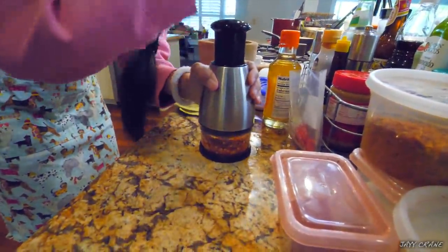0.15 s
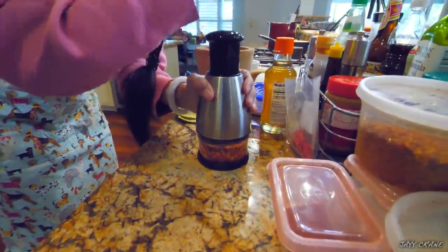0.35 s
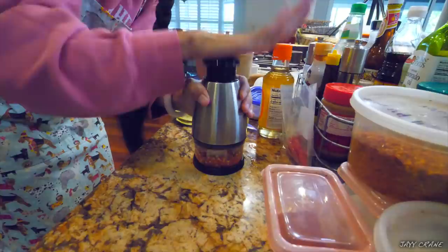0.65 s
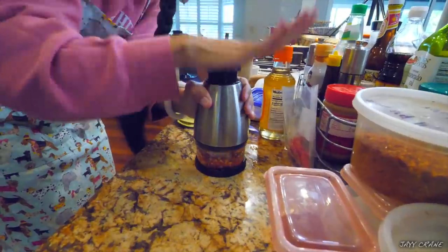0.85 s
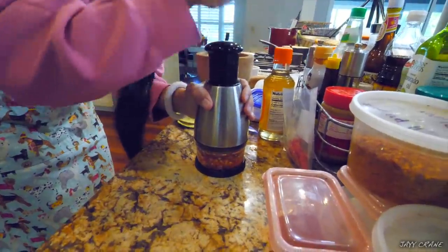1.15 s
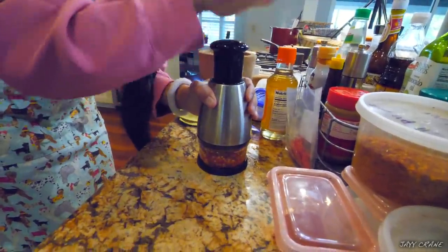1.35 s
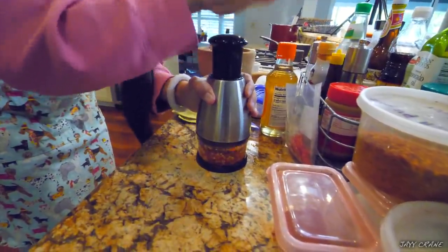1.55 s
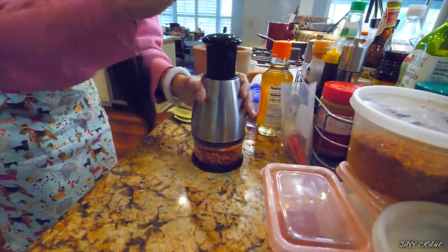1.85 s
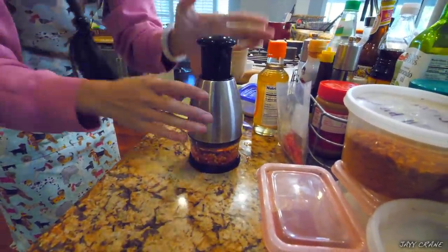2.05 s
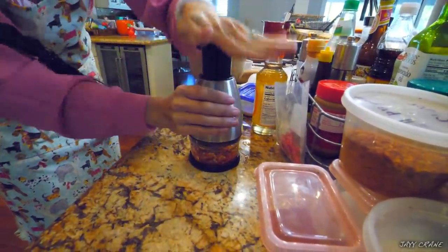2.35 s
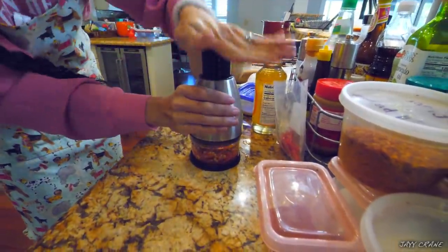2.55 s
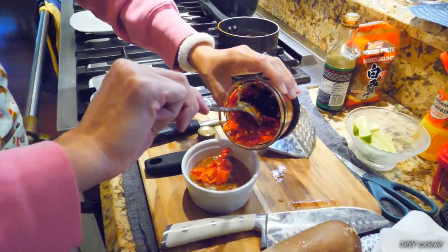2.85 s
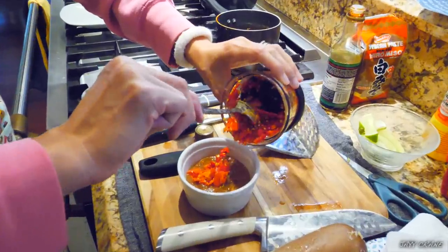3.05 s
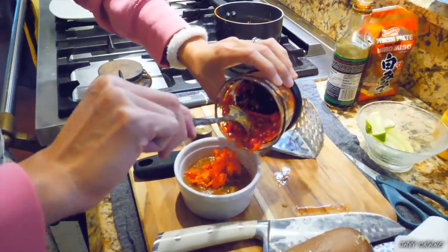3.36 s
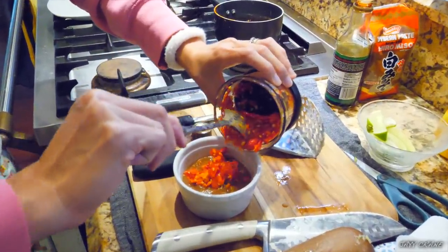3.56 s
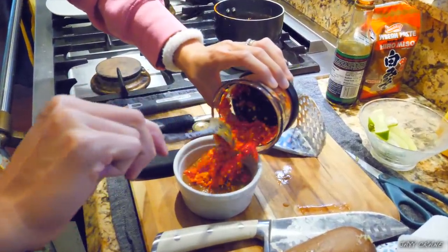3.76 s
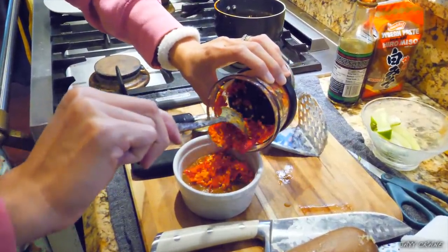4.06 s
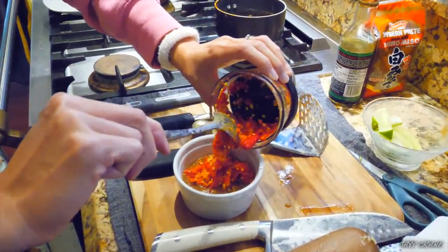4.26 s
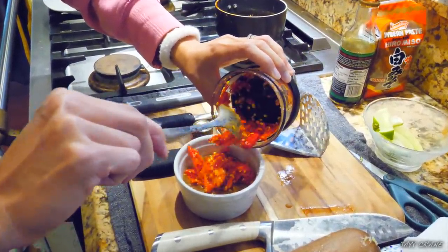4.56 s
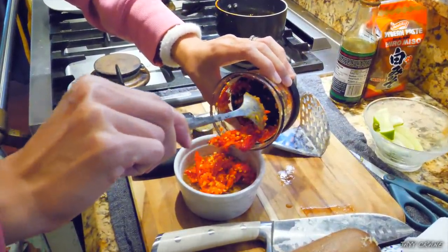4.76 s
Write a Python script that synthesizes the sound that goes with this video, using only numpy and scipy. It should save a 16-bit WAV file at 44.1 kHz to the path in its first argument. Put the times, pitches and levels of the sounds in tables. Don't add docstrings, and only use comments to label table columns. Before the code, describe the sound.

Eleven fast clattering presses of a steel plunger chopper in a hard kitchen, then an abrupt cut to faint spoon scraping over a low hum.

```python
import sys
import numpy as np
from scipy import signal
from scipy.io import wavfile
from scipy.ndimage import uniform_filter1d

SR = 44100
rng = np.random.default_rng(int(sys.argv[2]) if len(sys.argv) > 2 else 0)


def attenuation_scalar(level_db):
    decades = np.asarray(level_db, float) / 20
    return 10 ** decades


def master(y):
    cut = np.clip(np.atleast_2d(y).T, -1, 1)
    pcm = np.round(cut * 32767)
    wavfile.write(sys.argv[1], SR, pcm.astype(np.int16))


N = 216387


def evened(x):
    return x / np.sqrt(np.mean(x ** 2) + 1e-20)


def peaked(x):
    return x / np.sqrt(uniform_filter1d(x ** 2, size=128).max() + 1e-20)


def read(points, hz):
    f, value = np.transpose(points)
    return np.interp(np.log(hz + 1), np.log(f + 1), value)


def add(mix, s, sound):
    part = mix[max(round(s * SR), 0):][:len(sound)]
    part += sound[:len(part)]


def shaped(x, spectrum):
    hz = np.linspace(0, SR / 2, 513)
    return signal.oaconvolve(x, signal.firwin2(1023, hz, attenuation_scalar(read(spectrum, hz)), fs=SR), "same")


def ring(x, modes, spread_db=0, shift=0):
    out = np.zeros(len(x))
    for (hz, width, db), (level_luck, pitch_luck) in zip(modes, rng.standard_normal((len(modes), 2))):
        radius = np.exp(-np.pi * width / SR)
        angle = 2 * np.pi * hz * (1 + shift * pitch_luck) / SR
        poles = [1, -2 * radius * np.cos(angle), radius ** 2]
        gain = attenuation_scalar(db + spread_db * level_luck) * (1 - radius ** 2)
        out += gain * signal.lfilter([1, 0, -1], poles, x)
    return out


def coloured(spectrum, patchy_db):
    hz = np.fft.rfftfreq(1024, 1 / SR)
    a, b, patches = rng.standard_normal((N // 256 + 5, 513, 3)).T
    patches = uniform_filter1d(patches, size=12, axis=0)
    patches = evened(uniform_filter1d(patches, size=14, axis=1))
    z = (a + 1j * b) * attenuation_scalar(read(spectrum, hz)[:, None] + patchy_db * patches)
    return evened(signal.istft(z, nperseg=1024, noverlap=768)[1][:N])


def gritty(grit_db):
    unevenness = evened(uniform_filter1d(rng.standard_normal(N), size=60))
    return evened(rng.standard_normal(N) * attenuation_scalar(grit_db * unevenness))


# f/Hz, bandwidth/Hz, level/dB
HOLLOW = [(302, 540, -4.5), (454, 270, 1), (645, 89, -3), (920, 240, -8)]
# f/Hz, bandwidth/Hz, level/dB
SHELL = [(1045, 120, 6.5), (1400, 530, 3.5), (1698, 310, -17), (2210, 300, 2), (1500, 7500, -8)]
# f/Hz, bandwidth/Hz, level/dB
CRACK = [(4550, 720, 3.5), (4900, 67, -9), (5500, 840, 1.5), (6500, 400, -1), (7860, 550, 0.5),
         (9100, 1000, -11.5), (6000, 5000, -3.5), (12000, 7200, -0.5)]
SMALL_BODY = signal.butter(4, 190, "high", fs=SR, output="sos")


def clack(mix, s, shell_db, hollow_db, ring_db, crack_db, blades, rattle_s,
          blow=3., lead_s=0., bounce=0., crack=CRACK, cavity=HOLLOW):
    t = np.arange(2500) / SR - lead_s
    chatter = rng.standard_normal(2500) * np.exp(-(np.maximum(t, 0) / rattle_s) ** 2.3)
    early = chatter * np.minimum((t + lead_s) / (lead_s + 0.1 * rattle_s), 1)
    late = chatter * np.clip(t / (0.29 * rattle_s), 0, 1)
    hit = np.exp(-((t - .0002) / .00006) ** 2)
    second_hit = np.exp(-((t - .0018) / .00006) ** 2)
    push = -blow * (hit + bounce * second_hit)
    sound = attenuation_scalar(crack_db) * peaked(ring(early + push, crack, spread_db=5.5, shift=.015))
    sound += attenuation_scalar(ring_db) * peaked(ring(late + push, blades, spread_db=4.5, shift=0.0075))
    sound += attenuation_scalar(shell_db) * peaked(ring(late + push, SHELL, spread_db=4.0, shift=.04))
    sound += attenuation_scalar(hollow_db) * peaked(ring(1.6 * late + push, cavity, spread_db=0.5, shift=.03))
    add(mix, s - lead_s, signal.sosfilt(SMALL_BODY, sound))


# f/Hz, bandwidth/Hz, level/dB
RING_UP = [(3000, 130, -8), (3214, 76, 0), (3292, 150, 1.5), (3443, 89, -2.5)]


def small_clack(mix, kind, s, db, hz, rattle_s=None):
    body_db, ring_db, usual_rattle_s = kind
    clack(mix, s, db + body_db, db + body_db - 1.5, db + ring_db, db, RING_UP, rattle_s or usual_rattle_s,
          blow=.4, crack=CRACK + [(hz, 170, 16)], cavity=HOLLOW[1:])


# t/s, body level/dB, steel level/dB, downward slide level/dB
SLAPS = [(.0062, -20, -13, -28.5), (.2146, -14.5, -12.5, -22), (.4357, -16, -12, -19),
         (.643, -16, -12.5, -19.5), (.8502, -12, -15, -22), (1.0513, -17, -10.5, -22.5),
         (1.2617, -19, -10.5, -19), (1.4569, -23.5, -20.5, -31), (1.662, -23, -14, -23.5),
         (2.2963, -28.5, -17, -33.5), (2.508, -26.5, -14.5, -22)]
# f/Hz, bandwidth/Hz, level/dB
RING_DOWN = [(2945, 240, 5), (3170, 150, -0.5)]


def slaps(mix):
    for s, body_db, steel_db, _ in SLAPS:
        clack(mix, s, body_db, body_db - 10.5, steel_db - 12.5, steel_db, RING_DOWN, .005,
              blow=2.5, lead_s=.0018, cavity=HOLLOW[1:])


# t/s, body level/dB, steel level/dB, counter thud level/dB
LANDINGS = [(.0252, -21.5, -21.5, -25.5), (.2333, -17, -23.5, -21.5), (.4549, -19, -22, -24.5),
            (.662, -15, -17, -24.5), (.8712, -18.5, -26, -32), (1.0704, -38, -25, -30.5),
            (1.2797, -21.5, -20.5, -26), (1.48, -33.5, -28.5, -32.5), (1.682, -33, -26.5, -34.5),
            (2.3173, -21, -19.5, -28.5), (2.5242, -22.5, -19, -40)]
# f/Hz, bandwidth/Hz, level/dB
THUD = [(115, 28, 0.016), (178, 53, 0.00016)]


def landings(mix):
    for s, body_db, steel_db, thud_db in LANDINGS:
        clack(mix, s, body_db, body_db - 0.052, steel_db, steel_db, RING_DOWN, 0.0022, blow=0.81)
        squash = np.diff(np.hanning(130))
        add(mix, s, attenuation_scalar(thud_db) * peaked(ring(np.pad(squash, (0, 6000)), THUD)))


# t/s, body level/dB, steel level/dB, rattle length/s, loudest cup mode f/Hz
RETURNS = [(0.0886, -9.5, -13.5, .0054, 600), (.31, -15, -12.5, .005, 590), (0.5164, -13, -16, .01, 600),
           (.726, -15, -12.5, .0044, 560), (0.9331, -13, -12.5, .009, 600), (1.1394, -16, -16, .0081, 660),
           (1.3491, -18.5, -15, .0081, 600), (1.556, -19, -17, .013, 630), (1.799, -15, -16, .0078, 310),
           (2.403, -12, -14, .0046, 430), (2.6098, -11.5, -14.5, .0056, 540)]


def spring_returns(mix):
    latch = (4.1, -3.4, 0.007)  # body/dB, blade ring/dB, rattle/s
    latch_lead_s, latch_db, latch_fade_db_per_s = .015, -21.5, -2
    for s, body_db, steel_db, rattle_s, cup_hz in RETURNS:
        clack(mix, s, body_db, body_db + 2.2, steel_db + 2.6, steel_db, RING_UP, rattle_s,
              blow=4., bounce=1.1, cavity=HOLLOW + [(cup_hz, 240, 0)])
        click_db = steel_db + latch_db + latch_fade_db_per_s * s
        small_clack(mix, latch, s - latch_lead_s, click_db, 5500)


# t/s, crack level/dB, loudest blade mode f/Hz, rattle length/s
CHATTERS = [(.008, -22, 1650, 0.013), (.013, -23, 3000, .006), (.019, -18, 3900, .004),
            (.433, -19, 8000, 0.0064), (.443, -15.5, 5000, 0.0047), (.642, -14, 4900, 0.0058),
            (1.061, -27.5, 5000, .004), (1.258, -15.5, 4900, .0056), (1.46, -22, 10300, 0.0045),
            (1.67, -23, 3250, 0.0032), (2.296, -4.5, 7050, 0.0022), (2.31, -15.5, 9000, .005),
            (2.52, -22.5, 5000, .005)]
# t/s, crack level/dB, loudest blade mode f/Hz
REBOUNDS = [(.095, -24.5, 4500), (.315, -12.5, 4550), (.7282, -15.5, 6500), (.735, -23, 3200),
            (1.1404, -14.5, 5500), (1.3537, -14, 6300), (1.562, -15.5, 5400), (1.808, -19, 4500),
            (2.419, -29, 7500), (2.621, -26, 4600)]
# t/s, crack level/dB, loudest blade mode f/Hz
CATCHES = [(.268, -38.5, 8000), (.281, -34, 9000), (.499, -35.5, 9500), (1.319, -32.5, 9000),
           (1.361, -37.5, 6246), (1.513, -40, 3000), (1.536, -44, 9000), (1.72, -40.5, 10530),
           (1.835, -37, 9000), (2.236, -62.5, 12730), (2.25, -63, 8000), (2.274, -60.5, 3500),
           (2.578, -35.5, 7000), (2.589, -42, 6500)]


def loose_knocks(mix):
    chatter, rebound, catch = (-15, -12.5, 0.0071), (-4.5, -2, .003), (0, -1.5, .005)  # body/dB, ring/dB, rattle/s
    for rows, kind in ((CHATTERS, chatter), (REBOUNDS, rebound), (CATCHES, catch)):
        for row in rows:
            small_clack(mix, kind, *row)


# f/Hz, spectral level/dB per Hz
SLIDE = [(88, -40.5), (150, -7), (745, -1), (2450, -5), (3100, -14.5), (3620, -8), (6140, -14.5),
         (9080, -9.5), (13400, -14), (16000, -24)]


def sliding():
    rubbing, t = np.zeros(N), np.arange(N) / SR
    rise_db = -39
    for slap, landing, back in zip(SLAPS, LANDINGS, RETURNS):
        down = [slap[0], slap[0] + 0.009, landing[0] + 0.0044, landing[0] + 0.012]
        up = [landing[0], back[0] - .03, back[0]]
        rubbing += attenuation_scalar(slap[3]) * np.interp(t, down, [0.0058, 0.6, 0.96, 0])
        rubbing += attenuation_scalar(rise_db) * np.interp(t, up, [.7, 1, .7], 0, 0)
    slips = gritty(1.8)
    friction = evened(shaped(slips, SLIDE)) + 0.47 * evened(ring(slips, RING_DOWN + CRACK[1:2]))
    return rubbing * evened(friction)


def chopper():
    mix = np.zeros(N)
    slaps(mix)
    landings(mix)
    spring_returns(mix)
    loose_knocks(mix)
    return mix + sliding()


# f/Hz, level/dB, t60/s
SINGING = [(2966, -17, 2.0), (3500, -1.5, 0.16), (3478, -7, 0.17), (3670, -16, 0.4), (4174, -18, 0.41),
           (4540, -21.5, 0.75)]
# t/s, level/dB, f/Hz, t60/s
PINGS = [
    (0.013, -25, 1580, 0.087),
    (.316, -33, 4510, 0.36),
    (1.262, -20.5, 4800, 0.076),
    (.645, -26, 4900, .04),
    (1.672, -17, 3150, 0.041),
    (1.81, -48.5, 3490, .8),
]


def singing():
    mix, t = np.zeros(N), np.arange(SR // 2) / SR
    under_clack_db = -27
    for back, luck in zip(RETURNS, rng.standard_normal((len(RETURNS), len(SINGING), 3))):
        tones = np.zeros(len(t))
        for (hz, db, t60), (level_luck, pitch_luck, phase_luck) in zip(SINGING, luck):
            phase = 2 * np.pi * hz * (1 + 0.0044 * pitch_luck) * t + 3 * phase_luck
            tones += attenuation_scalar(db + 4 * level_luck - 60 * t / t60) * np.sin(phase)
        add(mix, back[0], attenuation_scalar(back[2] + under_clack_db) * peaked(tones))
    for s, db, hz, t60 in PINGS:
        onset = np.minimum(t / .002, 1)
        add(mix, s, attenuation_scalar(db - 60 * t / t60) * onset * np.sin(2 * np.pi * hz * t))
    return mix


# f/Hz, t60/s
KITCHEN = [(120, .5), (400, 0.92), (1040, 1), (2760, 0.82), (7280, .75), (14000, 0.38)]


def kitchen(count):
    taps = np.zeros((count, SR))
    slots = np.arange(200, SR - 16, 16)
    at = slots + rng.integers(0, 16, (count, len(slots)))
    np.put_along_axis(taps, at, rng.choice([-1., 1.], at.shape), 1)
    hz, t, z = signal.stft(taps, SR, nperseg=256)
    decay = attenuation_scalar(-60 * t / read(KITCHEN, hz)[:, None])
    decay = decay + 5.9 * attenuation_scalar(-60 * t / 0.054)
    tail = signal.istft(z * decay, SR, nperseg=256)[1]
    sides = np.array([chopper() for _ in range(count)])
    return signal.fftconvolve(sides, tail / np.linalg.norm(tail), axes=1)[:, :N].sum(0)


# start t/s, length/s, cup wall level/dB, wet fizz level/dB, spoon edge level/dB
SCRAPE = [(2.703, 0.058, -54, -46.5, -65), (2.885, .06, -66, -58, -62), (3.06, .2, -65, -69, -80),
          (3.203, 0.33, -62, -81, -80), (3.171, 0.047, -56, -55, -75), (3.29, 0.22, -71, -66, -63),
          (3.653, 0.075, -80, -62.5, -75), (3.705, 0.11, -81, -60, -65), (4.045, .08, -62, -71, -77),
          (4.175, .12, -67.5, -57, -61), (4.417, 0.2, -56.5, -56.5, -52), (4.57, 0.26, -70.5, -66, -73)]
# f/Hz, bandwidth/Hz, level/dB
SCRAPE_WALL = [(1500, 660, -3.5), (2330, 810, 0), (3270, 2000, -6.5)]
# f/Hz, bandwidth/Hz, level/dB
SCRAPE_FIZZ = [(5000, 7400, 10), (9000, 5100, 11), (9900, 970, -27)]
# f/Hz, bandwidth/Hz, level/dB
SCRAPE_EDGE = [(6800, 460, 0)]


def spoon_drags():
    t = np.arange(N) / SR
    start, length, wall_db, fizz_db, edge_db = np.transpose(SCRAPE)[..., None]
    bite = np.clip((t - start) / 0.015, 0, 1)
    lift = np.clip((start + length - t) / (0.26 * length), 0, 1)
    drag = bite * lift * attenuation_scalar(-10 * np.clip((t - start) / length, 0, 1))
    stir_wall_db, stir_fizz_db = -72, -76
    wall_level = attenuation_scalar(stir_wall_db) + (attenuation_scalar(wall_db) * drag).sum(0)
    fizz_level = attenuation_scalar(stir_fizz_db) + (attenuation_scalar(fizz_db) * drag).sum(0)
    edge_level = (attenuation_scalar(edge_db - 7.0) * drag).sum(0)
    mix = wall_level * evened(ring(ring(gritty(2.13), SCRAPE_WALL), SCRAPE_WALL))
    mix += fizz_level * evened(ring(gritty(2.6), SCRAPE_FIZZ))
    mix += edge_level * evened(ring(ring(gritty(5.2), SCRAPE_EDGE), SCRAPE_EDGE))
    return mix


# t/s, level/dB, f/Hz
TICKS = [(2.779, -55, 7000), (2.8992, -41, 3320), (2.8995, -40, 9000), (3.085, -54, 3330),
         (3.183, -48, 4010), (3.242, -57, 9800), (3.32, -64, 9900), (3.346, -45, 9900), (3.347, -52, 6000),
         (3.367, -58, 6500), (3.406, -55, 5500), (3.442, -47.5, 10000), (3.491, -60.5, 3200),
         (3.661, -52, 8500), (3.681, -59.5, 6700), (3.96, -50, 1500), (4.063, -53.5, 8000),
         (4.092, -52, 5550), (4.179, -51.5, 3000), (4.21, -42.5, 8200), (4.211, -50, 12000),
         (4.225, -48, 8600), (4.257, -48.5, 6500), (4.256, -50.5, 10940), (4.39, -66, 5000),
         (4.466, -51, 10530), (4.497, -50, 9000), (4.59, -57, 10000), (4.609, -48, 10060)]


def spoon_ticks():
    mix, t = np.zeros(N), np.arange(800) / SR
    for s, db, hz in TICKS:
        snap = rng.standard_normal(800) * np.exp(-t / 0.0021)
        width = 0.64 * hz
        tick = ring(ring(snap, [(hz, width, 0)]), [(hz, 2 * width, 0)])
        add(mix, s, attenuation_scalar(db) * peaked(tick))
    return mix


# f/Hz, rms level/dB
HUM = [(120.4, -68), (181.0, -62), (202.5, -73), (242.4, -70.5), (301.8, -68), (386.3, -76), (570.9, -76),
       (856, -78)]
# f/Hz, bandwidth/Hz, level/dB
WHINE = [(4627, 20, 0), (3088, 20, 0)]
# middle t/s, length/s, level/dB
DRONE = [
    (2.72, 0.21, -61),
    (3.3, .3, -64.5),
    (4.013, 0.58, -59.5),
    (4.849, .1, -65),
]


def hum():
    t = np.arange(N) / SR
    tones = np.zeros(N)
    for hz, db in HUM:
        steady = np.sqrt(2) * np.sin(2 * np.pi * hz * t + 6 * rng.random())
        wavering = evened(ring(rng.standard_normal(N), [(hz, 22, 0)]))
        tones += attenuation_scalar(db) * (0.95 * steady + 0.46 * wavering)
    tones += attenuation_scalar(-81) * evened(ring(rng.standard_normal(N), WHINE))
    swell = np.full(N, attenuation_scalar(-76))
    for s, length, db in DRONE:
        swell += attenuation_scalar(db) * np.exp(-(2 * (t - s) / length) ** 2)
    band = [(277.5, 58, 0)]
    return tones + swell * evened(ring(ring(rng.standard_normal(N), band), band))


# f/Hz, spectral level/dB per Hz
AIR = [(25, -6), (200, -5), (750, 0), (2000, -10.5), (3400, -8.5), (6000, -21.5), (10000, -25),
       (16000, -31)]


def counter_air():
    return attenuation_scalar(-57) * coloured(AIR, patchy_db=2.0)


# f/Hz, spectral level/dB per Hz
STOVE = [(15, -38), (33, -2.5), (60, -12), (85, -28), (130, -14), (300, -5.5), (600, -5.5), (1330, -11),
         (2500, -22), (5000, -22.5), (10000, -25.5), (16000, -26.5)]


def stove_air():
    return attenuation_scalar(-57.5) * coloured(STOVE, patchy_db=1.5)


def house_rumble():
    mode = [(32, 8.3, 0)]
    return attenuation_scalar(-70) * evened(ring(ring(rng.standard_normal(N), mode), mode))


def scene():
    scene_change_s, kitchen_db = 2.6828, -11
    counter = chopper() + attenuation_scalar(kitchen_db) * kitchen(count=3) + singing() + counter_air()
    stove = stove_air() + hum() + spoon_drags() + spoon_ticks()
    heard = np.where(np.arange(N) < scene_change_s * SR, counter, stove)
    return (heard + house_rumble())[None]


# f/Hz, level/dB
MIC = [(20, 1), (8000, -3.5), (12000, -9.5), (15000, -9.5), (15900, -12), (16400, -27), (16850, -32.5),
       (17000, -75), (22050, -80)]


def low_pass(x):
    return signal.sosfilt(signal.butter(12, 16820, fs=SR, output="sos"), x)


def record(dry):
    heard = shaped(dry[0], MIC)[None]
    finished = np.clip(heard, -1, 1)
    return low_pass(finished)


dry = scene()
out = record(dry)
master(out)
```